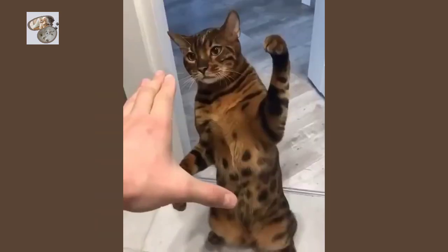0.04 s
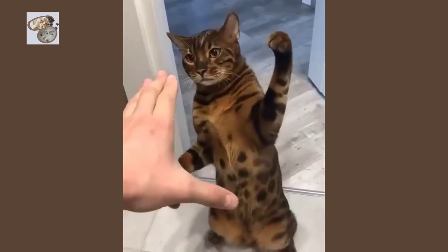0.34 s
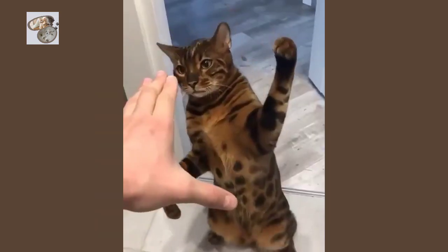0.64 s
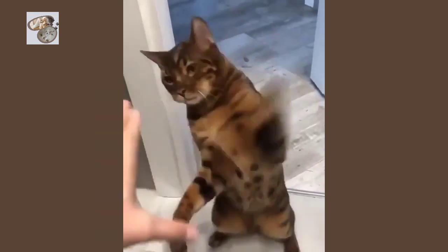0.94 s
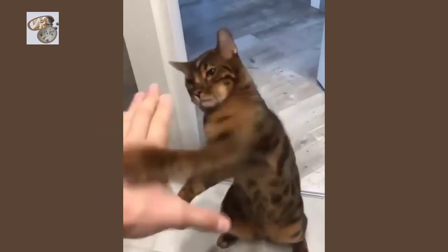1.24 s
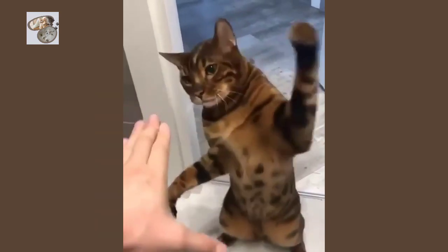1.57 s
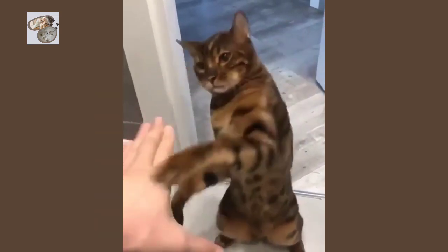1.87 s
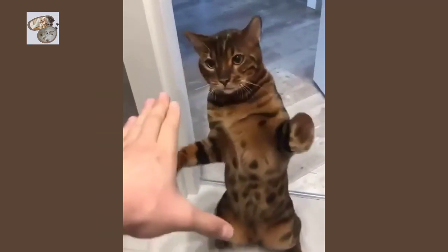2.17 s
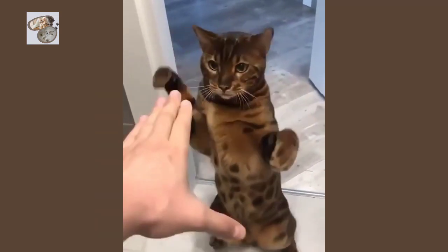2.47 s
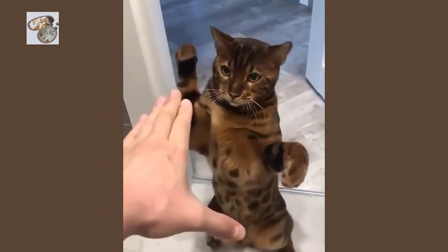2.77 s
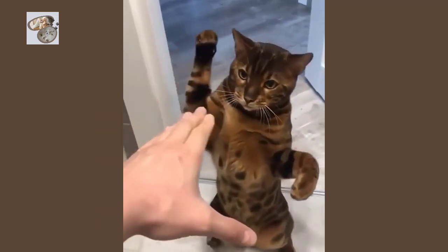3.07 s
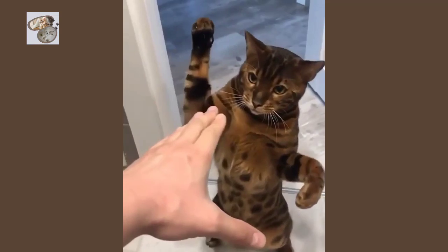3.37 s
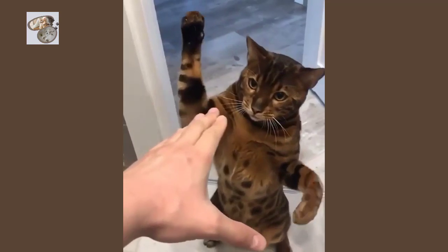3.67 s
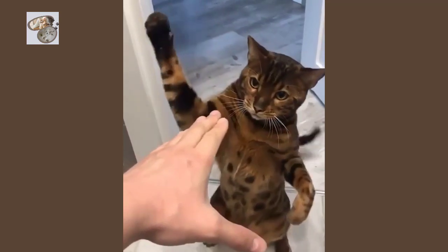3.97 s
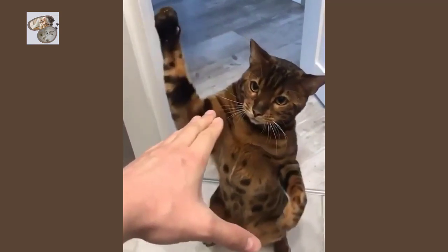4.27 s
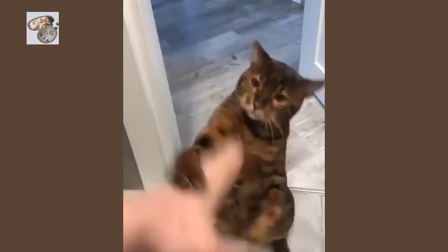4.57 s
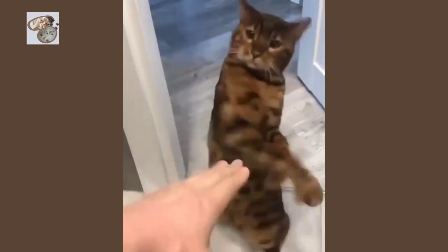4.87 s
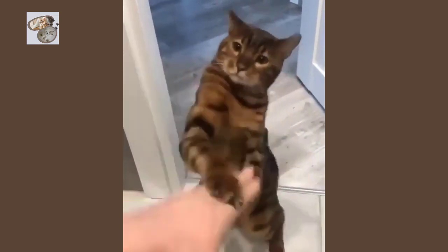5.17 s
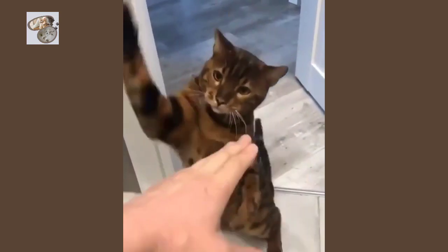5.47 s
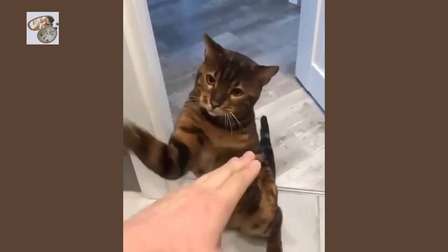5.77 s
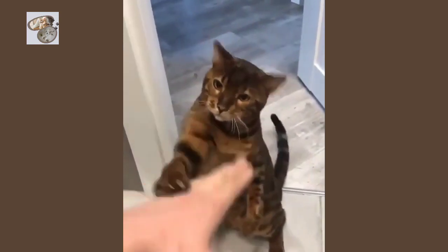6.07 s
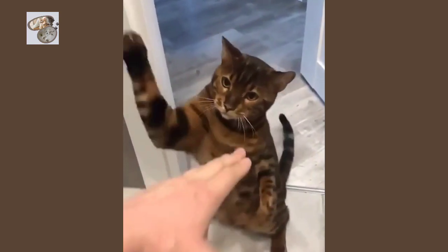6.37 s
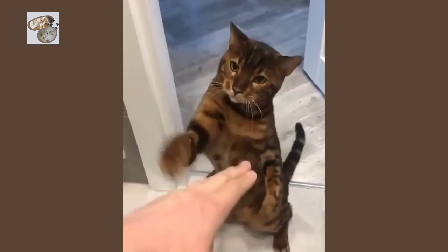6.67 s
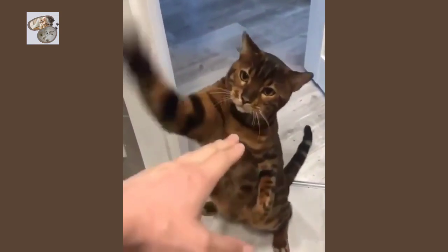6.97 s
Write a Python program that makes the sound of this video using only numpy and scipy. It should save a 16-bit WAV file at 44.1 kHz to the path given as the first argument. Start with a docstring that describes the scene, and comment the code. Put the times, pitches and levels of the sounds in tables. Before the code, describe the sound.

Close, sharp slaps of a cat's paw on a hand, three then six, with soft fur scuffs and a short room ring.

```python
"""A standing cat slaps an open palm, close to a phone microphone in a small, hard-walled room.
Each blow smacks the skin, pops the air cupped under the paw and thuds the hand; the room rings after it,
and at this distance the hardest blows overload the microphone. Fur and feet scuff softly around them.
Behind the cat are hiss, a faint hum and a low rumble from which a drone swells once."""
import sys
import numpy as np
from scipy import signal
from scipy.fft import rfft, irfft
from scipy.io import wavfile
from scipy.ndimage import uniform_filter1d

SR = 44100
rng = np.random.default_rng(int(sys.argv[2]) if len(sys.argv) > 2 else 0)


def persist_wave(psi):
    """Save psi, clipped to +-1, as 16-bit WAV."""
    counts = np.round(np.clip(psi, -1, 1) * 32767).astype(np.int16)
    wavfile.write(sys.argv[1], SR, np.atleast_2d(counts).T)


N = 318843


def amp(db):
    """Decibels to gain."""
    return 10 ** (np.asarray(db) / 20)


def curve_at(points, hz):
    """A table of (frequency, value) joined by straight lines over log frequency."""
    table_hz, value = np.transpose(points)
    return np.interp(np.log(hz + 1), np.log(table_hz + 1), value)


def unit_rms(x):
    """Scales to rms 1."""
    return x / np.sqrt(np.mean(x ** 2) + 1e-20)


def burst(x, db):
    """Scales a short sound to the energy of 10 ms at this level."""
    return amp(db) * x / np.sqrt(np.sum(x ** 2) / (SR / 100) + 1e-20)


def add(mix, start_s, sound):
    """Mixes a sound into both channels."""
    part = mix[:, round(start_s * SR):][:, :sound.shape[-1]]
    part += sound[..., :part.shape[-1]]


def noise(gain, size):
    """Noise of rms 1 whose spectrum is the function gain(Hz)."""
    white = rfft(rng.standard_normal(size))
    return unit_rms(irfft(white * gain(np.fft.rfftfreq(size, 1 / SR)), size))


def band(centre_hz, octaves):
    """A bell-shaped spectrum over log frequency."""
    return lambda hz: np.exp(-.5 * (np.log2((hz + 1) / centre_hz) / octaves) ** 2)


def drift(rate_hz):
    """A slow random wander of rms 1, mostly below this rate."""
    return noise(lambda hz: np.exp(-(hz / rate_hz) ** 2), N)


def rumble(pitch_hz=66.3, rest_db=-51.5, drone_db=-43.5, peak_s=2.72, rise_s=0.16, fall_s=0.57):
    """A narrow low rumble; once a throbbing drone rises from it and sinks back slowly."""
    t = np.arange(N) / SR - peak_s
    hump = np.exp(-.5 * (t / np.where(t < 0, rise_s, fall_s)) ** 2)
    waver_db = 2.5 * drift(rate_hz=1.68)
    drone_hz = pitch_hz + 3.75 * drift(rate_hz=1.68)
    throb = amp(2.5 * drift(rate_hz=9))
    drone = unit_rms(throb * np.sin(2 * np.pi * np.cumsum(drone_hz) / SR))
    resting = amp(rest_db + waver_db) * noise(band(pitch_hz, octaves=0.031), N)
    return resting + amp(drone_db) * hump * drone


def hum(pitch_hz=789, level_db=-61):
    """A faint, fuzzy tone, as of a distant fan."""
    return amp(level_db) * noise(band(pitch_hz, octaves=0.045), N)


def flicker(x, depth_db=2.2, full_depth_hz=2000):
    """The treble flickers in small patches of time and frequency, as in compressed audio."""
    frames = signal.stft(x, nperseg=1024)[2]
    patches = uniform_filter1d(rng.standard_normal(frames.shape), size=2, axis=0)
    patches = unit_rms(uniform_filter1d(patches, size=6, axis=1))
    treble = np.minimum(np.fft.rfftfreq(1024, 1 / SR) / full_depth_hz, 1)[:, None]
    return unit_rms(signal.istft(frames * amp(depth_db * treble * patches), nperseg=1024)[1][:len(x)])


# stereo width of diffuse sound at the microphone: (frequency [Hz], side gain [dB])
STEREO_WIDTH = [(1800, -62), (3000, -63), (3700, -19), (4400, -6), (7000, -1), (9500, -4.5), (12000, -3.5)]
def spread(centre, apart):
    """Left and right from two unrelated sounds: alike in the bass, partly different in the treble."""
    size = len(apart)
    side = irfft(rfft(apart) * amp(curve_at(STEREO_WIDTH, np.fft.rfftfreq(size, 1 / SR))), size)
    return np.array([centre + side, centre - side])


# background hiss: (frequency [Hz], relative level [dB])
HISS_SPECTRUM = [(20, -19), (45, -4.5), (100, -10.5), (271, -13.5), (475, -20.5), (700, -21), (790, -22.5),
                 (900, -21.5), (1390, -28), (3930, -35), (5010, -40), (9020, -42), (11700, -45.5),
                 (12800, -64), (16000, -75)]
def hiss(level_db=-46):
    """Background hiss, wide in the treble, with a patchy treble flicker laid over it."""
    centre, apart = (flicker(noise(lambda hz: amp(curve_at(HISS_SPECTRUM, hz)), N)) for _ in range(2))
    return amp(level_db) * spread(centre, apart)


def wall_resonances(ripple_db=3.3, spacing_hz=26, full_depth_hz=1600):
    """The room's many small resonances as a gain over Hz: random peaks and dips, milder in the bass."""
    grid_hz = np.arange(0, SR / 2, spacing_hz)
    depth_db = ripple_db * np.minimum(grid_hz / full_depth_hz, 1)
    gain = unit_rms(amp(depth_db * np.clip(rng.standard_normal(len(grid_hz)), -2, 2)))
    return lambda hz: np.interp(hz, grid_hz, gain)


def broad_spectrum(sound, size, parts=8):
    """Magnitude spectrum averaged over one part in `parts` either side of each frequency."""
    running_power = np.cumsum(abs(rfft(sound, size)) ** 2)
    k = np.arange(len(running_power))
    lo, hi = np.maximum(k - k // parts - 1, 0), np.minimum(k + k // parts + 1, k[-1])
    return np.sqrt(np.maximum(running_power[hi] - running_power[lo], 0) / (hi - lo) + 1e-14)


# colour of the room's diffuse ring, plus a treble cut above about 12 kHz: (frequency [Hz], gain [dB])
TAIL_COLOUR = [(40, -1), (120, -5), (165, -6.5), (240, 7.5), (310, 2.5), (400, 3), (500, -4), (630, -2.5),
               (900, -1.5), (1400, -5.5), (2000, -7.5), (3200, -7.5), (4800, -7), (8000, -6.5),
               (11800, -7.5), (13500, -36)]
# reverberation time of the small room: (frequency [Hz], time to fall 60 dB [s])
TAIL_T60 = [(100, 0.42), (500, 0.36), (1500, 0.39), (5000, 0.37), (11000, 0.29)]
def diffuse_tail(sound, walls, size):
    """The walls mix sound from all directions: it keeps its broad colour and takes their resonances."""
    bin_hz = np.fft.rfftfreq(size, 1 / SR)
    colour = broad_spectrum(sound, size, parts=5) * amp(curve_at(TAIL_COLOUR, bin_hz)) * walls(bin_hz)
    wash = irfft(rfft(rng.standard_normal(size)) * colour, size)
    hz, frame_s, frames = signal.stft(wash, SR, nperseg=256)
    decay_rate = np.log(1000) / curve_at(TAIL_T60, hz)[:, None]
    onset_s = np.argmax(abs(sound)) / SR
    decay = np.exp(-decay_rate * np.maximum(frame_s - onset_s, 0))
    frames = frames * np.sqrt(2 * decay_rate / SR) * decay  # same energy however long a band rings
    since_onset_s = np.maximum(np.arange(size) / SR - onset_s, 0)
    build_up = 1 - np.exp(-(since_onset_s / 0.0014) ** 2)
    return signal.istft(frames, SR, nperseg=256)[1][:size] * build_up


# modes of the room at the microphone: (frequency [Hz], relative level [dB], time to fall 60 dB [s])
STANDING_WAVES = [(67.1, -9, 0.84), (186.5, -1, 0.68), (222.5, -12.5, 1), (267.7, 0.5, 0.6),
                  (286, -8, 0.66), (345.6, 8.5, 0.2), (382, 3.5, 0.42), (462, 5.5, 0.21), (593, -5.5, 0.47),
                  (660, 1, 0.087), (679, -7, 0.62), (820, -10, 0.37), (1023, -13.5, 0.78),
                  (1110, -7.5, 0.5), (1180, -7, .5), (1330, -18, 0.53), (1603, 3, 0.11),
                  (1800, -16.5, 0.32), (2210, -14.5, 0.63), (3220, -24, 0.69)]
def standing_waves(size, level_db=-56):
    """Sound caught between the walls rings on at the room's own pitches."""
    t = np.arange(size) / SR
    return sum(amp(level_db + db) * np.cos(2 * np.pi * hz * t) * np.exp(-np.log(1000) * t / t60)
               for hz, db, t60 in STANDING_WAVES)


# door frame, floor and wall near the microphone: (delay [s], level against the direct sound [dB])
NEAR_ECHOES = [(.0029, -16), (.0063, -15.5), (.0093, -17)]
def near_echoes(size):
    """One reflection off each nearby surface, its delay a little different every time."""
    response = np.zeros(size)
    for delay_s, db in NEAR_ECHOES:
        response[round(delay_s * rng.uniform(.94, 1.06) * SR)] += amp(db)
    return response


def room(sound, walls, wet_db=0):
    """What reaches the close microphone: direct sound, near echoes, standing waves and diffuse tail."""
    size = 2 * SR // 3
    response = near_echoes(size) + amp(wet_db) * standing_waves(size)
    response[0] += 1  # the direct path
    centre, apart = (diffuse_tail(sound, walls, size) for _ in range(2))
    diffuse = spread(centre, amp(-16) * apart)
    return signal.fftconvolve(sound, response)[:size] + amp(wet_db) * diffuse


def swell(t, peak_s):
    """A push that rises to its peak and dies away."""
    return t / peak_s * np.exp(-t / peak_s)


# tilt of a scuff, which loses its highest treble: (frequency [Hz], relative gain [dB])
SCUFF_TILT = [(100, 13), (10500, -11), (13500, -37), (16000, -58)]
# fur and feet near the microphone: (time [s], level [dB], band centre [Hz], width [octaves], swell [s])
SHUFFLES = [(0.952, -47, 3500, 1.8, 0.019), (3.602, -42.5, 1870, 0.77, 0.022),
            (3.617, -41, 127, 0.17, 0.016), (4.908, -43.5, 346, 0.31, 0.0053),
            (4.920, -36, 576, 0.12, 0.005), (4.972, -39.5, 477, 0.24, 0.017),
            (5.036, -33, 7000, 2.5, 0.024), (5.119, -42, 7800, 3, 0.048), (5.291, -44, 6000, 1.8, 0.028),
            (5.388, -29, 6760, 2.1, 0.0021)]
def scuffs(walls):
    """Fur or a foot slides briefly: soft puffs of friction noise in the room."""
    mix = np.zeros((2, N))
    t = np.arange(SR // 3) / SR
    for start_s, db, centre_hz, octaves, swell_s in SHUFFLES:
        colour = band(centre_hz, octaves)
        friction = noise(lambda hz: colour(hz) * amp(curve_at(SCUFF_TILT, hz)), len(t))
        add(mix, start_s, room(burst(friction * swell(t, swell_s), db), walls))
    return mix


def ring(t, hz, decay_s, rise_s):
    """A damped resonance with a soft start."""
    t = np.maximum(t, 0)
    return np.sin(2 * np.pi * hz * t) * np.exp(-t / decay_s) * (1 - np.exp(-t / rise_s))


def patter(gain, envelope):
    """Many tiny contacts under one envelope: a short crack whose spectrum is the function gain(Hz)."""
    size = len(envelope)
    contacts = rng.standard_normal(size) * envelope
    flattened = rfft(contacts) / broad_spectrum(contacts, size)
    return irfft(flattened * gain(np.fft.rfftfreq(size, 1 / SR)), size)


# snap of pads on skin, before each blow's tilt: (frequency [Hz], relative level [dB])
PAD_SNAP = [(500, -66), (1700, -10), (2300, -2), (3100, -5), (4200, -4), (5200, -6), (6800, -6),
            (9500, -7.5), (12000, -18), (16000, -57)]
def slap(t, thud_db, flesh_db, flesh_hz, cup_db, cup_hz, cup_decay_s, smack_db, smack_hz,
         low_db, low_hz, high_db, high_hz, snap_db, tilt_db_per_octave, contact_s):
    """Fur grazes the skin and the pads hit at t = 0; then the trapped air pops and the hand gives way."""
    graze = 0.031 * np.exp(-abs(t) / 0.0024)
    contact = swell(np.maximum(t, 0), contact_s) + graze
    smack = patter(band(smack_hz, octaves=0.51), contact)
    snap = patter(lambda hz: amp(curve_at(PAD_SNAP, hz) + tilt_db_per_octave * np.log2(hz + 1)), contact)
    # two small air gaps between pads and palm ring briefly, their pitches set by how the paw lands
    since_squeeze = t - 0.572 * contact_s
    cracks = sum(burst(ring(since_squeeze, hz, decay_s=0.001, rise_s=0.00076), db)
                 for db, hz in [(low_db, low_hz), (high_db, high_hz)])
    since_press = t - 1.153 * contact_s
    cup = ring(since_press, cup_hz, cup_decay_s, rise_s=0.0003)
    flesh = ring(since_press, flesh_hz, decay_s=0.0015, rise_s=0.001)
    thud = ring(since_press - 0.0017, hz=85.3, decay_s=0.0038, rise_s=0.0089)  # the arm yields just after
    return (burst(smack, smack_db) + cracks + burst(snap, snap_db)
            + burst(cup, cup_db) + burst(flesh, flesh_db) - burst(thud, thud_db))


# paw on palm, close to the microphone: (time [s], arm thud [dB], flesh [dB], flesh pitch [Hz],
# cupped air [dB], cup pitch [Hz], cup decay [s], smack [dB], smack pitch [Hz], low crack [dB],
# low pitch [Hz], high crack [dB], high pitch [Hz], snap [dB], snap tilt [dB/octave], contact time [s],
# reverberation gain [dB])
PAW_BLOWS = [(0.9987, -23.5, -25.5, 257, -19, 610, 0.0014, -20, 1200, -20.5, 2900, -23, 4280, -20, -3, 0.0011, 0.5),
             (1.5021, -26, -23, 321, -15.5, 570, 0.0028, -24, 1270, -26, 2680, -20.5, 4760, -14, -4, 0.00062, 0),
             (1.9896, -28, -28, 289, -15, 576, 0.00087, -15.5, 1050, -10.5, 1685, -13, 3180, -14, -3, 0.00059, -2),
             (4.776, -36, -20.5, 256, -15.5, 594, 0.0018, -13.5, 1110, -13.5, 1640, -14, 2850, -9, -4.5, 0.0011, -.5),
             (5.0444, -19, -27.5, 240, -27.5, 542, 0.0024, -48, 1080, -42.5, 2330, -56, 4080, -44, 3, 0.0019, 1.5),
             (5.3724, -18, -27, 207, -26, 594, 0.0032, -27.5, 1020, -32, 2390, -27, 3270, -23.5, -3.5, 0.00156, 1),
             (5.81, -41, -33, 275, -15, 648, 0.0016, -23, 870, -23.5, 1320, -30, 3690, -22, -2.5, 0.00072, -0.5),
             (6.2940, -28.5, -35, 350, -21, 608, 0.0023, -19, 960, -28, 1840, -23, 3290, -15.5, -7, 0.00089, 0),
             (6.736, -41, -51, 335, -22, 640, 0.0017, -27, 860, -29, 2290, -29, 3950, -23.5, -5.5, 0.00066, 0.5)]
def paw_slaps(walls, graze_lead_s=0.008):
    """The cat strikes the palm blow by blow, and each blow sets the room ringing."""
    mix = np.zeros((2, N))
    t = np.arange(SR // 10) / SR - graze_lead_s
    for hit_s, *blow, wet_db in PAW_BLOWS:
        add(mix, hit_s - graze_lead_s, room(slap(t, *blow), walls, wet_db))
    return mix


def scene():
    """The cat close and straight ahead of the microphone; hiss, hum and rumble behind it."""
    walls = wall_resonances()
    cat = paw_slaps(walls) + scuffs(walls)
    background = hiss() + hum() + rumble()
    return cat + background


def record(dry):
    """The phone microphone opens, sheds the deepest bass, clips at full scale and is band-limited."""
    open_s, fade_s = 0.14, 0.02
    bass_cut_hz, treble_cut_hz = 46, 16200
    fade_in = np.clip((np.arange(N) / SR - open_s) / fade_s, 0, 1)
    highpass = signal.butter(2, bass_cut_hz, "high", fs=SR, output="sos")
    clipped = np.clip(signal.sosfilt(highpass, dry * fade_in), -1, 1)
    lowpass = signal.firwin(511, treble_cut_hz, window=("kaiser", 9), fs=SR)
    return signal.oaconvolve(clipped, lowpass[None], "same")


dry = scene()
out = record(dry)
persist_wave(out)
```